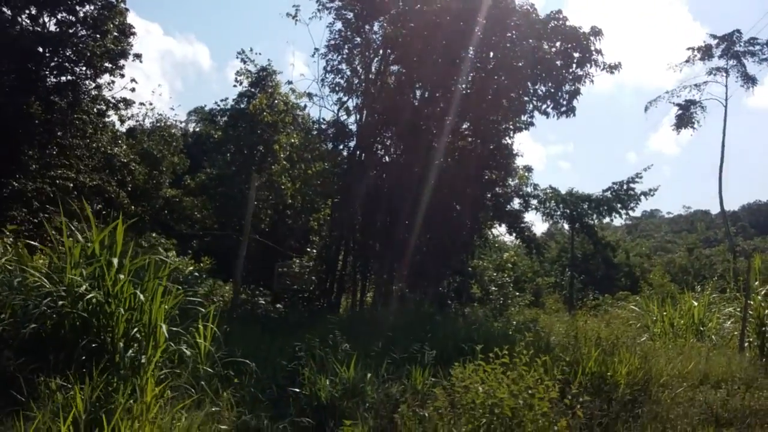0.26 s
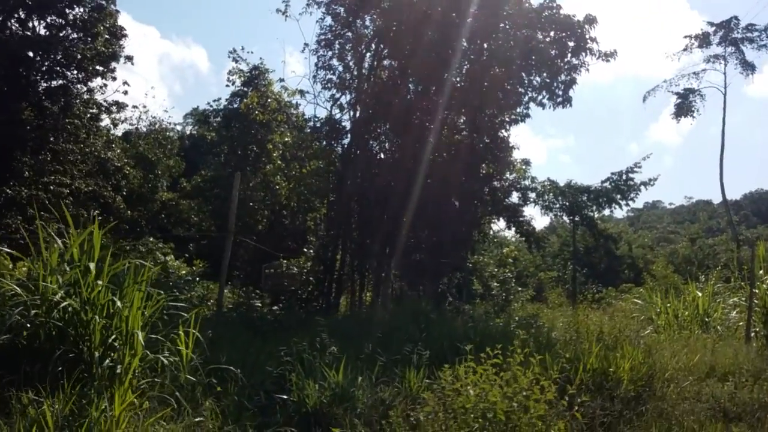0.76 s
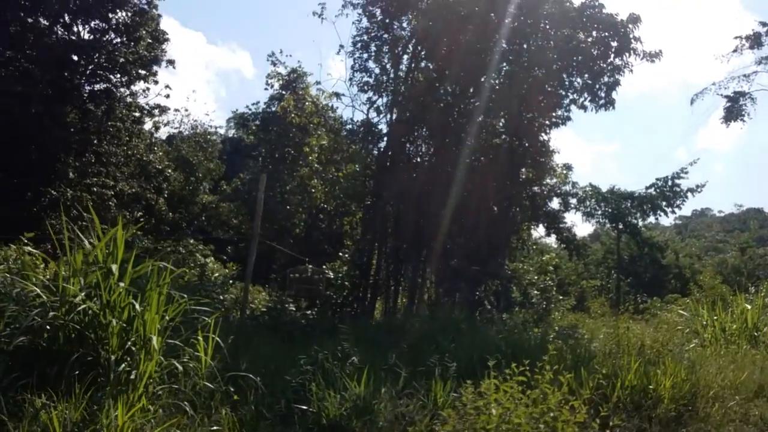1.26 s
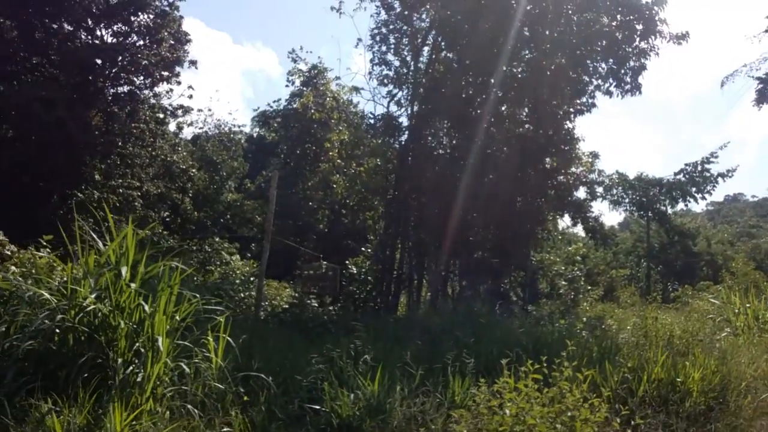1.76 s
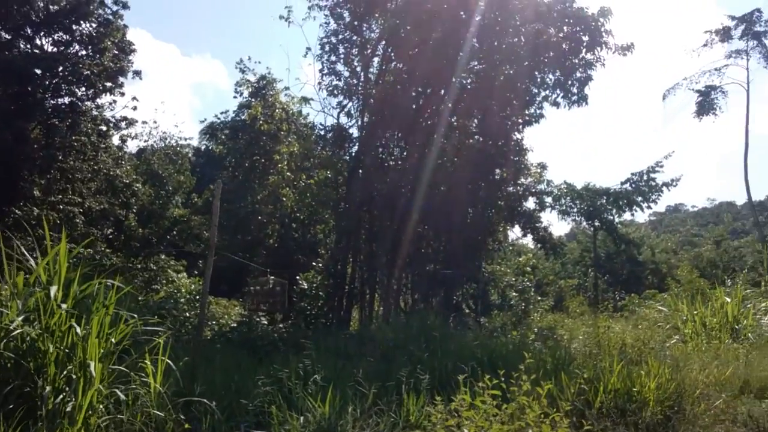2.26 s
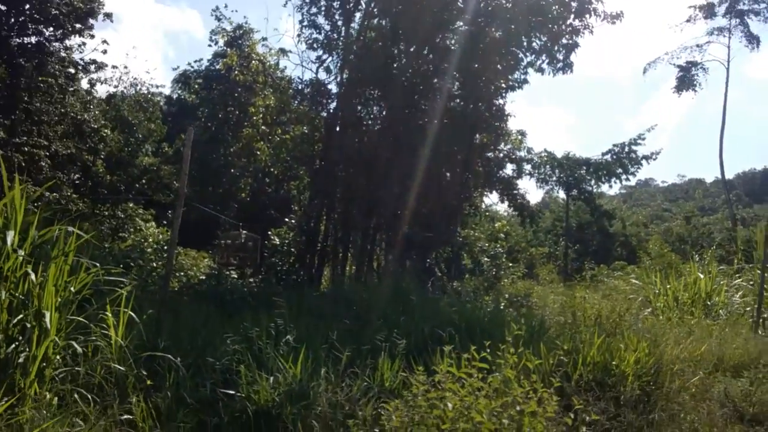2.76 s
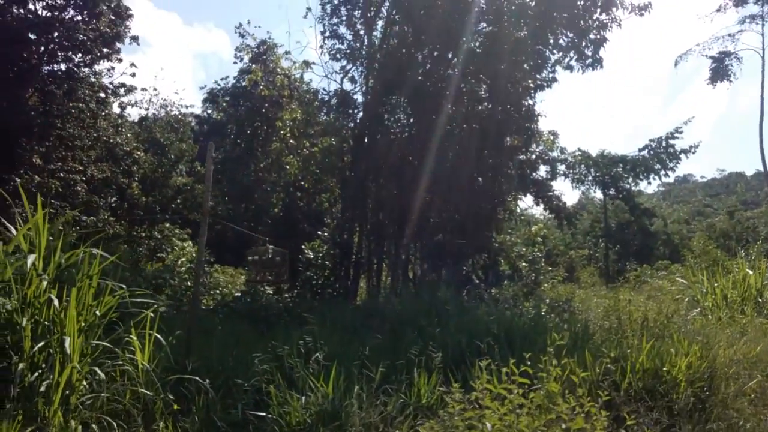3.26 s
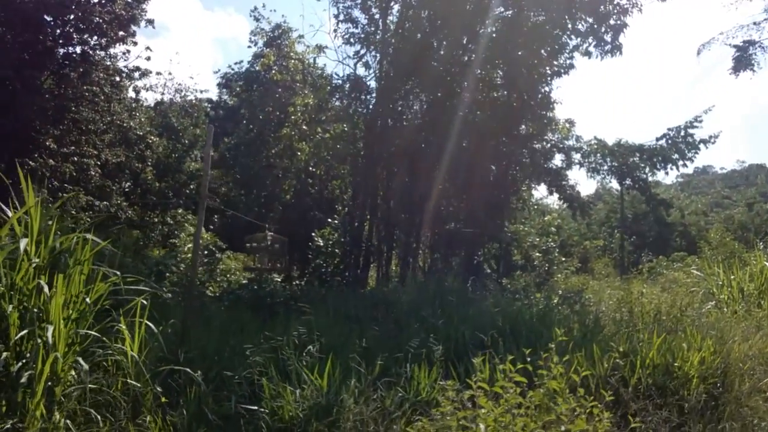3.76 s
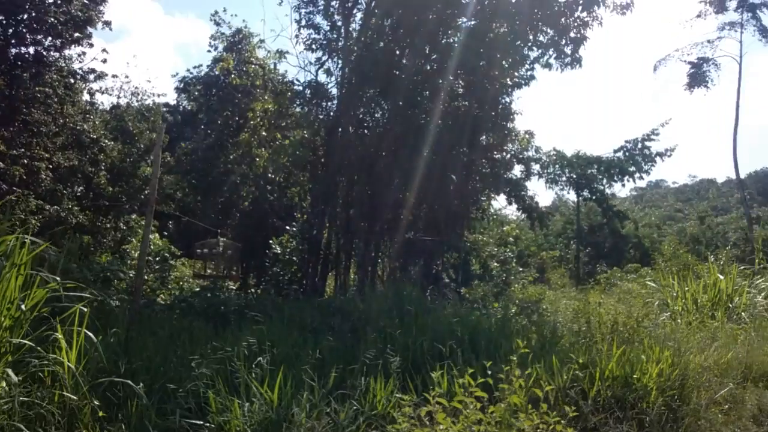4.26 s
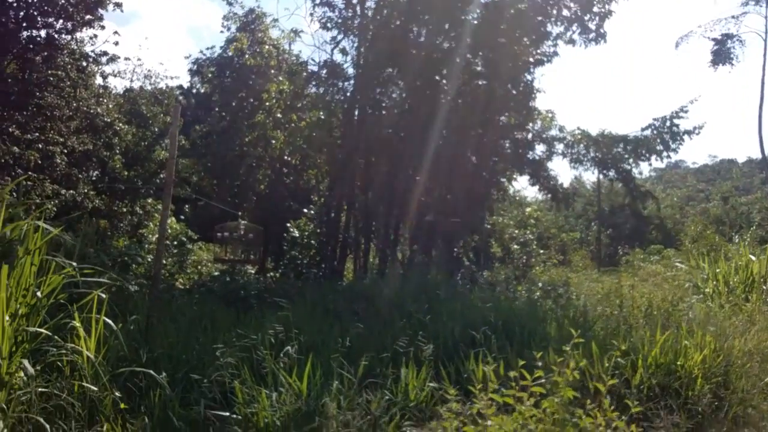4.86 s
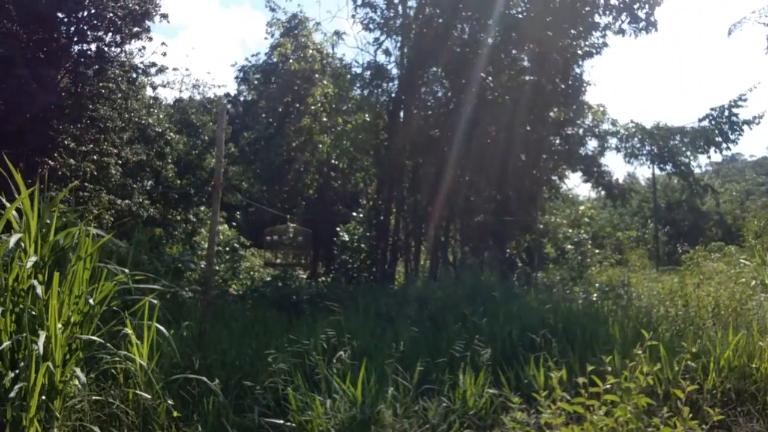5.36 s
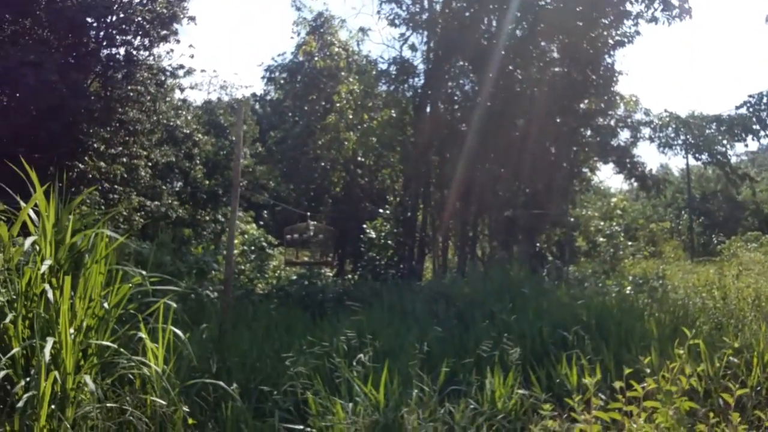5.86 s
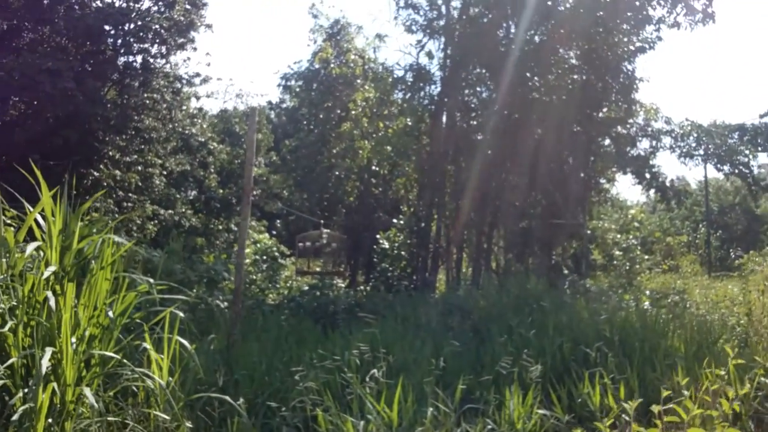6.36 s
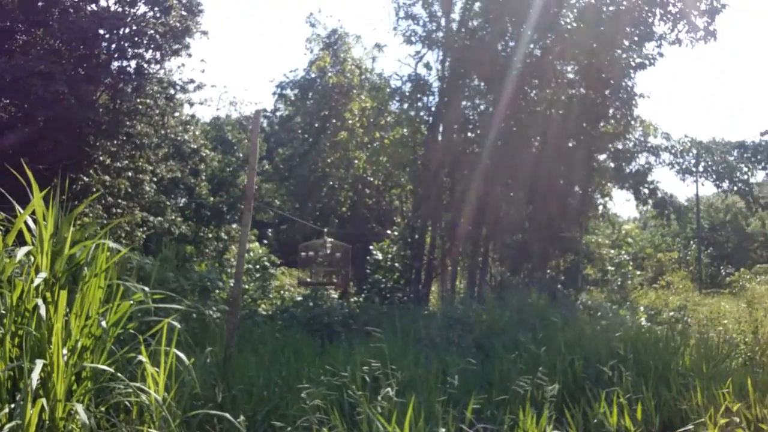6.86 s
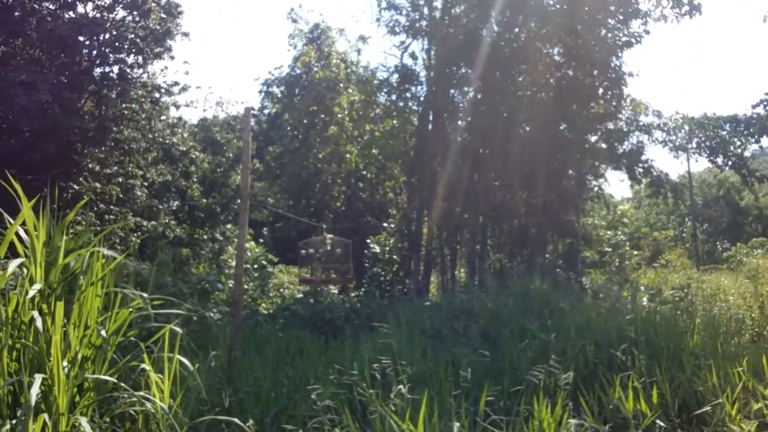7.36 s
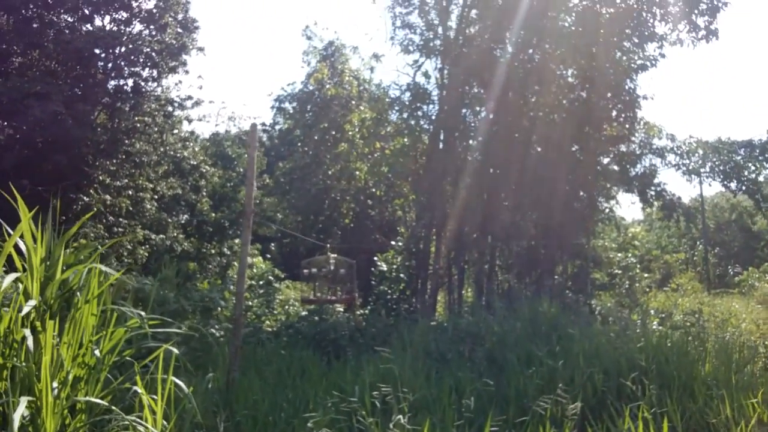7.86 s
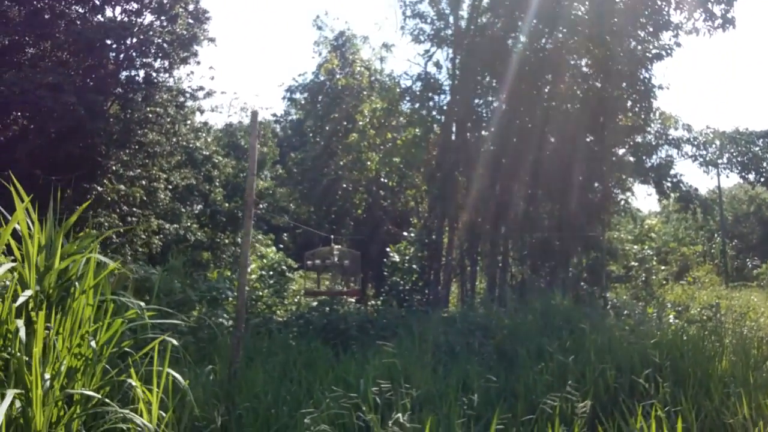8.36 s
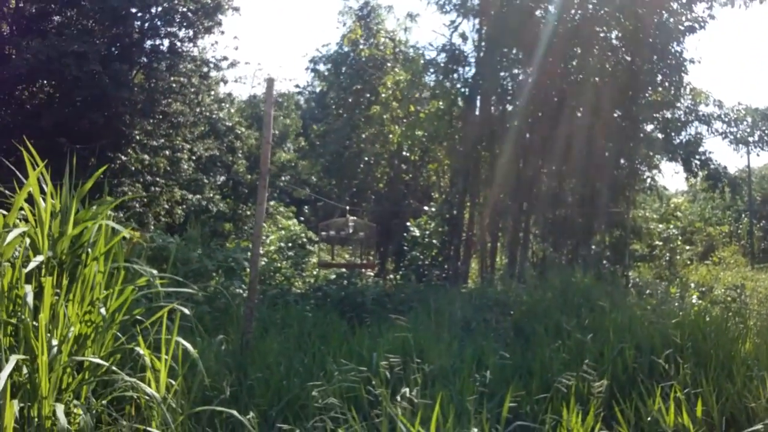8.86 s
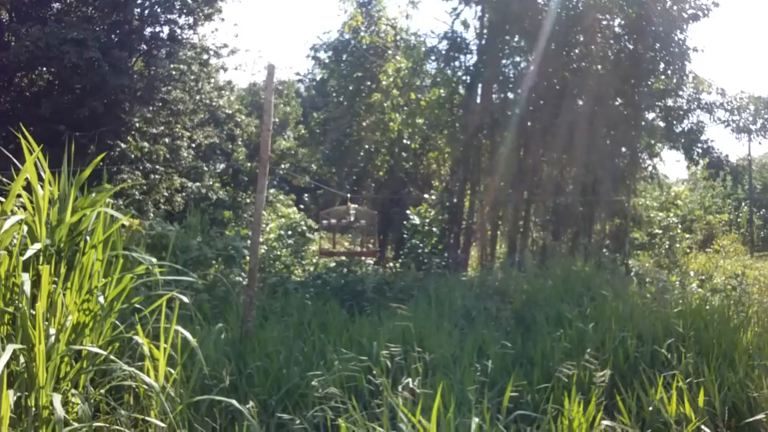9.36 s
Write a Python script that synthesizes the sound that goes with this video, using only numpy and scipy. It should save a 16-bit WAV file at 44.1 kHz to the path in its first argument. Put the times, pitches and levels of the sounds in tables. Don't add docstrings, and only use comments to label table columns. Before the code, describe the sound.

A quiet outdoor meadow with soft hiss and faint pulsing crickets. Dry grass stems tick near a handheld microphone. A small finch gives one soft rising whistle, then a brief nasal call; wild birds answer from the trees in quick sliding chirps. A stalk scrapes the casing midway. Later the close finch whistles three brighter rising notes, as wind thumps low, and a few distant chirps follow.

```python
import sys
import numpy as np
from scipy import signal
from scipy.io import wavfile
from scipy.ndimage import uniform_filter1d

SR = 44100
rng = np.random.default_rng(int(sys.argv[2]) if len(sys.argv) > 2 else 0)


def bounce(signal):
    frames = np.transpose(np.atleast_2d(signal))
    limited = np.clip(frames, -1, 1)
    pcm = np.round(limited * 32767).astype(np.int16)
    wavfile.write(sys.argv[1], SR, pcm)


def gain_from_decibels(decibels):
    exponent = np.asarray(decibels, float) / 20
    return 10 ** exponent


N = 423360


def rms_one(x):
    return x / np.sqrt(np.mean(x ** 2) + 1e-20)


def band(x, low_hz, high_hz):
    sos = signal.butter(2, [low_hz, min(high_hz, .47 * SR)], "band", fs=SR, output="sos")
    return signal.sosfilt(sos, x)


def add(out, start_s, sound):
    at = int(start_s * SR)
    out[at:at + len(sound)] += sound[:max(N - at, 0)]


def drift(rate_hz, size):
    knots = rng.standard_normal(int(size / SR * 400) + 402)
    r = np.exp(-2 * np.pi * rate_hz / 400)
    slow = rms_one(signal.lfilter([1], [1, -2 * r, r * r], knots)[400:])
    return np.interp(np.arange(size) * 400 / SR, np.arange(len(slow)), slow)


def birdsong(notes, waver_db, waver_hz, rough, overtone_db):
    out = np.zeros(N)
    for note in notes:
        s, hz, db = np.transpose(note)
        t = np.arange(s[0], s[-1], 1 / SR)

        glide = uniform_filter1d(np.interp(t, s, hz), size=300, mode="nearest")
        pitch = glide + waver_hz * drift(70, len(t))
        phase = 2 * np.pi * np.cumsum(pitch) / SR
        tone = np.sin(phase) + gain_from_decibels(overtone_db) * np.sin(2 * phase)

        swell = np.interp(t, s, gain_from_decibels(.7 * db)) ** (1 / .7)
        swell = uniform_filter1d(swell, size=60, mode="nearest")
        rasp = band(rng.standard_normal(len(t)), 70, 600)
        level = swell * gain_from_decibels(waver_db * drift(60, len(t))) * (1 + rough * rasp)
        fade = np.clip(np.minimum(t - s[0], s[-1] - t) / .002, 0, 1)
        add(out, s[0], np.sqrt(2) * level * fade * tone)
    return out


def foliage(x, spread_s, direct_db):
    t = np.arange(SR // 4) / SR
    paths = rng.standard_normal(len(t)) * np.exp(-t / spread_s)
    paths /= np.sqrt(np.sum(paths ** 2))
    paths[0] = gain_from_decibels(direct_db)
    return signal.fftconvolve(x, paths / np.sqrt(np.sum(paths ** 2)))[:N]


def caged_finch():
    # [start_s, pitch_hz, level_db]
    whistles = [
        [(1.5, 3311, -61.1), (1.52, 3315, -43.8), (1.5339, 3438, -53.2), (1.5479, 3579, -35.8),
         (1.5554, 3592, -35.7), (1.5803, 3667, -28.3), (1.6018, 3621, -64.2)],
        [(7.34, 3378, -57.8), (7.3664, 3412, -44.6), (7.3739, 3405, -30.6), (7.3874, 3616, -40.1),
         (7.4029, 3657, -21.7), (7.4243, 3667, -22.9), (7.4348, 3709, -18.8), (7.4433, 3717, -29.0),
         (7.4527, 3661, -42.8)],
        [(7.945, 2948, -45.0), (7.9694, 3144, -27.4), (7.9769, 3232, -33.3), (7.9904, 3341, -23.6),
         (7.9999, 3475, -29.7), (8.0268, 3636, -15.5), (8.0383, 3705, -16.4), (8.0458, 3773, -28.5),
         (8.0687, 3912, -11.4), (8.0707, 3940, -12.1), (8.0757, 3928, -26.7), (8.0827, 3776, -30.7)],
        [(8.215, 2875, -44.0), (8.2344, 3090, -42.0), (8.2579, 3210, -20.3), (8.2783, 3436, -24.5),
         (8.2838, 3539, -17.3), (8.2963, 3674, -14.2), (8.3013, 3729, -14.4), (8.3043, 3833, -21.6),
         (8.3153, 3932, -13.0), (8.3307, 4019, -11.7), (8.3462, 4072, -13.5), (8.3597, 4075, -44.1)],
    ]
    return birdsong(whistles, waver_db=.4, waver_hz=14, rough=.2, overtone_db=-55)


def nasal_call():
    # [start_s, pitch_hz, level_db]
    partials = [
        [(2.206, 3569, -49), (2.241, 3875, -55), (2.305, 3960, -42.5), (2.323, 4270, -34.5), (2.335, 4323, -29),
         (2.358, 4280, -31), (2.372, 4640, -47)],
        [(2.211, 5470, -57), (2.24, 5818, -44.5), (2.272, 5817, -48), (2.299, 5901, -42), (2.327, 6530, -54),
         (2.36, 6542, -64)],
        [(2.296, 4072, -43), (2.318, 4840, -37), (2.345, 4830, -34), (2.359, 4920, -36), (2.372, 4670, -47)],
        [(2.231, 7640, -69), (2.289, 7840, -66), (2.31, 7957, -75)],
        [(2.321, 2444, -67), (2.353, 2441, -54), (2.365, 2433, -69)],
    ]
    return birdsong(partials, waver_db=1.5, waver_hz=35, rough=.5, overtone_db=-60)


def tree_birds():
    # [start_s, pitch_hz, level_db]
    tree_notes = [
        [(3.186, 4158, -63), (3.223, 3853, -52), (3.239, 3799, -56), (3.25, 3763, -73)],
        [(3.541, 4292, -64), (3.569, 4027, -51), (3.587, 3891, -48), (3.61, 3767, -61)],
        [(3.671, 3616, -61), (3.708, 3938, -46), (3.775, 3976, -50), (3.789, 4133, -43)],
        [(3.686, 5105, -76), (3.714, 4822, -53), (3.788, 4184, -42), (3.809, 4001, -42), (3.829, 3893, -53)],
        [(3.84, 2916, -70), (3.918, 3476, -63), (3.956, 3881, -44), (3.97, 3976, -55)],
        [(3.9, 6560, -66), (3.921, 6446, -51), (3.934, 6308, -68)],
        [(3.971, 5685, -59), (3.991, 5207, -53), (4.04, 4896, -65)],
        [(4.041, 5557, -70), (4.137, 4691, -52), (4.161, 4665, -43), (4.18, 4641, -43), (4.199, 4612, -53)],
        [(4.086, 6126, -67), (4.103, 6108, -49), (4.121, 6054, -62), (4.22, 6267, -53), (4.259, 6309, -67)],
        [(4.121, 4201, -52), (4.137, 4129, -39), (4.155, 3981, -41), (4.175, 3997, -49)],
        [(4.23, 4256, -60), (4.245, 4143, -39), (4.268, 3934, -35), (4.289, 3842, -55)],
        [(4.441, 3866, -52), (4.467, 3107, -59), (4.52, 2901, -61)],
        [(4.611, 5187, -61), (4.635, 4624, -47), (4.66, 4163, -42), (4.675, 3968, -44), (4.684, 3883, -57)],
        [(4.745, 4374, -50), (4.755, 4323, -44), (4.776, 4263, -47), (4.789, 4175, -55)],
        [(4.76, 3895, -59), (4.768, 3733, -45), (4.799, 3034, -64)],
        [(4.861, 2834, -67), (4.878, 3110, -58), (4.894, 3185, -58), (4.93, 3034, -69)],
        [(5.001, 4602, -63), (5.019, 4378, -48), (5.029, 4261, -57), (5.04, 4182, -61)],
        [(5.046, 5036, -55), (5.056, 5004, -51), (5.068, 4955, -63), (5.109, 4999, -62)],
        [(5.08, 2573, -68), (5.115, 2471, -62), (5.189, 2349, -71)],
        [(5.12, 4477, -58), (5.134, 4343, -51), (5.149, 4175, -58)],
        [(5.18, 4312, -56), (5.205, 3997, -47), (5.232, 3411, -53), (5.254, 2672, -63)],
        [(5.471, 5159, -66), (5.482, 4858, -58), (5.5, 4578, -66)],
        [(8.58, 5511, -67), (8.627, 4877, -51), (8.684, 4561, -42), (8.714, 4470, -42), (8.729, 4396, -56)],
        [(8.801, 6877, -71), (8.85, 5851, -64), (8.875, 5611, -57), (8.92, 5328, -59)],
        [(9.075, 4472, -63), (9.104, 4577, -47), (9.115, 4634, -57), (9.139, 4569, -56)],
        [(9.24, 4282, -55), (9.264, 4371, -51), (9.27, 4404, -55)],
        [(3.35, 2390, -71), (3.37, 2390, -66), (3.429, 2390, -65)],
        [(3.5, 2400, -69), (3.537, 2400, -65), (3.56, 2379, -70)],
    ]
    # [start_s, pitch_hz, level_db]
    faint_notes = [
        [(0, 265, -54.5), (.06, 245, -83)],
        [(2.21, 1846, -73), (2.3, 2000, -68)],
        [(3.75, 2130, -69.5), (3.9, 2250, -60.5)],
        [(2.205, 4350, -51), (2.235, 3900, -48.5)],
    ]
    song = birdsong(tree_notes + faint_notes, waver_db=2.5, waver_hz=45, rough=1.4, overtone_db=-60)
    return 1.2 * foliage(song, spread_s=.03, direct_db=4.0)


def snaps(rows, cycles, crack_db):
    out = np.zeros(N)
    t = np.arange(-100, 300) / SR
    grits = rng.standard_normal((len(rows), len(t)))
    for (s, db, hz), grit in zip(rows, grits):
        decay = np.exp(-np.abs(t) * hz / cycles * np.where(t < 0, 2, 1))
        swing = np.sin(2 * np.pi * hz * t) * decay
        crack = grit * np.exp(-np.abs(t) / 0.00031)
        add(out, s - .0015, gain_from_decibels(db) * (1.7 * swing + gain_from_decibels(crack_db) * crack))
    return out


def stalk_ticks():
    # [start_s, peak_db, ring_hz]
    dull_ticks = [(0.554, -49, 1920), (0.602, -46, 2580), (0.642, -46, 2160), (4.645, -36.5, 1360),
                  (4.736, -44, 2407), (5.708, -53, 870), (6.56, -41, 1960), (6.568, -38.5, 1480),
                  (6.706, -38, 1803), (6.725, -40, 1660), (7.947, -39.5, 1530), (7.968, -43, 2800)]
    # [start_s, peak_db, ring_hz]
    bright_ticks = [(0.5153, -44, 4050), (0.5546, -46, 4390), (0.602, -53, 3880), (0.6549, -33, 3780),
                    (0.7223, -36.5, 3600), (1.2497, -42, 3990), (1.4391, -46, 3800), (2.4813, -34, 4200),
                    (3.4371, -35, 3920), (6.7053, -38, 3600), (6.7253, -40.5, 3880), (6.9314, -43.5, 4190),
                    (9.382, -33, 3830)]
    return snaps(dull_ticks, cycles=1.3, crack_db=-15) + snaps(bright_ticks, cycles=.9, crack_db=-16)


def rustles():
    # [start_s, end_s, centre_hz, width_octaves, level_db, grains_per_s]
    swarms = [(2.175, 2.3, 5300, .5, -52, 3600), (3.759, 3.834, 7500, .35, -60.5, 4000),
              (3.93, 4.0, 5700, .35, -52.5, 3000), (4.313, 4.363, 2500, 2.5, -46.5, 3400),
              (4.354, 4.444, 5530, 0.73, -55, 2700), (4.435, 4.55, 3600, .5, -56, 3100),
              (5.097, 5.135, 5950, 0.58, -58, 1500), (5.294, 5.323, 4480, 1.4, -52, 1500),
              (5.361, 5.46, 4200, 1.3, -52.5, 2800), (5.442, 5.462, 4630, 1.1, -47.5, 1800),
              (5.603, 5.65, 5000, .8, -52, 2100), (8.609, 8.73, 4640, 0.32, -54, 4600),
              (6.219, 6.305, 4140, .35, -61, 2100), (7.33, 7.377, 4340, .4, -52.5, 1920),
              (7.532, 7.6, 4220, .3, -55.5, 2300), (7.893, 7.962, 4090, .35, -50.5, 1700),
              (9.242, 9.427, 4040, .3, -58.5, 1350), (3.984, 4.056, 4350, 0.44, -49, 3000)]
    out = np.zeros(N)
    for start, end, hz, octaves, db, per_s in swarms:
        draw = rng.random((3, SR // 4))[:, :int((end - start) * SR)]
        strength = gain_from_decibels(-3.0 * np.log(draw[1] + 1e-3))
        grains = (draw[0] < per_s / SR) * strength * np.sign(draw[2] - .5)
        edges = hz / 2 ** (octaves / 2), hz * 2 ** (octaves / 2)
        swarm = rms_one(band(band(grains + 1e-9, *edges), *edges))
        add(out, start, gain_from_decibels(db) * swarm * signal.windows.tukey(len(swarm), .5))
    return out


def scrape():
    # [start_s, peak_db]
    slips = [(5.618, -46), (5.625, -39), (5.63, -37), (5.635, -30), (5.638, -36), (5.641, -31),
             (5.6424, -24), (5.645, -24), (5.6475, -29), (5.6503, -21.5), (5.6535, -23), (5.6539, -19.5),
             (5.6577, -32), (5.664, -22), (5.666, -25)]
    # [mode_hz, level_db, width_hz]
    casing = [
        (3100, -8, 700),
        (4000, 0, 700),
        (6000, -9, 800),
        (9300, -21, 1500),
        (12500, -27, 2500),
    ]
    out, rows = np.zeros(N), np.array(slips)
    at = ((rows[:, 0] - .0006) * SR).astype(int)
    for hz, db, width in casing:
        knocks = np.zeros(N) + 1e-18
        strength = gain_from_decibels(rows[:, 1] + db + rng.normal(0, 1.8, len(at)))
        knocks[at] = strength * rng.choice([-1, 1], len(at))
        r, w = np.exp(-np.pi * width / SR), 2 * np.pi * hz / SR
        poles = [1, -2 * r * np.cos(w), r * r]
        once = signal.lfilter([1], poles, knocks)
        out += signal.lfilter([(1 - r) * 5 * np.sin(w) ** 2], poles, once)
    return band(band(out, 2900, 16000), 2600, 18000)


def wind():
    # [time_s, level_db]
    gust_levels = [(4.9, -70), (5.4, -63.5), (5.95, -66), (6.1, -68), (7.15, -74), (7.27, -52), (7.4, -66),
                   (7.55, -60.5), (7.8, -60.5), (8.0, -62), (8.3, -43), (8.62, -45.5), (8.75, -58),
                   (9.1, -61.5), (9.6, -86)]
    # [time_s, peak_db, swing_hz]
    thumps = [(5.597, -31.5, 107), (5.824, -36.5, 81), (5.922, -42.5, 64), (7.308, -48.5, 87.6),
              (7.601, -43, 60), (8.027, -43.5, 73), (8.077, -40, 96), (8.124, -41, 58), (8.197, -45, 67),
              (8.219, -50, 64), (8.246, -31, 78), (8.28, -28.5, 103.1), (8.3, -26, 108), (8.359, -33, 102),
              (8.388, -29, 96), (8.415, -26.5, 124), (8.474, -23, 76), (8.523, -38, 62), (8.579, -33, 78),
              (8.616, -30, 79.3), (8.644, -37, 55), (8.82, -46, 81), (8.865, -30.5, 132),
              (9.002, -43.5, 112), (9.101, -44, 67.5)]
    s, db = np.transpose(gust_levels)
    gust = np.interp(np.arange(N) / SR, s, db, left=-90)
    turbulence = rms_one(band(rng.standard_normal(N), 25, 101))
    out = gain_from_decibels(gust + 4.36 * drift(21, N)) * turbulence
    for (s, db, hz), turn in zip(thumps, rng.random(len(thumps))):
        t = np.arange(-1.3 / hz, 1.28 / hz, 1 / SR)
        swing = np.sin(2 * np.pi * (hz * t + turn))
        lopsided = swing + 0.51 * swing ** 2
        add(out, s + t[0], gain_from_decibels(db - 2.0) * np.hanning(len(t)) * lopsided)
    return out


def crickets():
    # [wing_hz, strokes_per_s, level_db, trills as (start_s, end_s)]
    singers = [
        (7230, 54.0, -72, [(0, .19), (.43, .69), (.95, 1.19), (1.37, 1.61), (1.89, 2.08), (2.38, 2.64), (2.83, 3.1), (3.32, 3.59), (3.85, 4.12), (4.31, 4.55), (4.75, 5.01), (5.19, 5.45), (5.67, 5.93), (6.14, 6.4), (6.7, 6.94), (7.22, 7.43), (7.65, 7.89), (8.08, 8.31), (8.52, 8.76), (9.03, 9.27), (9.45, 9.6)]),
        (7450, 55.0, -75, [(2.55, 2.75), (3.05, 3.26), (3.5, 3.74), (4.9, 5.07), (5.3, 5.53), (5.75, 6.0), (6.67, 6.92), (8.56, 8.77)]),
        (6850, 53.0, -76, [(.3, .6), (.75, 1.05), (1.42, 1.7), (3.3, 3.6), (4.75, 5.0), (5.7, 5.95), (6.15, 6.42), (8.5, 8.77)]),
        (5640, 53.5, -69.5, [(.53, .85), (1.3, 1.6), (2.9, 3.17), (3.72, 3.95), (4.5, 4.82), (5.45, 5.6), (6.1, 6.45), (6.9, 7.2), (7.55, 7.95), (8.45, 8.8)]),
        (5420, 53.7, -71.5, [(.1, .26), (.8, 1.1), (1.95, 2.17), (2.85, 3.05), (3.65, 3.8), (4.35, 4.5), (5.2, 5.45), (8.95, 9.6)]),
    ]
    out = np.zeros(N)
    for wing_hz, per_s, db, trills in singers:
        for start, end in trills:
            t = np.arange(0, end - start, 1 / SR)
            stroke = (t * per_s) % 1
            onset = np.clip(t / .06 + .3, 0, 1)
            shape = np.sin(np.pi * np.clip(stroke / .7, 0, 1)) * onset
            pitch = wing_hz * (1 + .05 * (.35 - stroke) + .007 * drift(20, len(t)))
            tone = np.sin(2 * np.pi * np.cumsum(pitch) / SR)
            level = 2.3 * gain_from_decibels(db + 1.5 * drift(10, len(t)))
            add(out, start, level * shape * tone)
    return foliage(out, spread_s=.02, direct_db=5.0)


def blades():
    draw = rng.random((3, N))
    touched = draw[0] < 200 * gain_from_decibels(5.0 * drift(1.5, N)) / SR
    grains = touched * gain_from_decibels(-2.5 * np.log(draw[1] + .02)) * np.sign(draw[2] - .5)
    return gain_from_decibels(-70) * rms_one(band(grains, 3300, 4500))


def meadow():
    # [freq_hz, density_db]
    spectrum = [(25, -18.5), (55, -5), (105, -0.5), (200, -6), (450, -8), (1000, -10.5), (2000, -10.5),
                (2900, -12.5), (3600, -9), (4300, -9), (5100, -15), (6000, -16), (7800, -23.5),
                (16000, -25.5)]
    out, edges = 0, 22 * 2 ** np.arange(0, 10, .3)
    white = rng.standard_normal((2, N))
    points = np.array(spectrum)
    for k, (low, high) in enumerate(zip(edges[:-2], edges[1:])):
        db = np.interp(np.log(low * high) / 2, np.log(points[:, 0]), points[:, 1])
        out = out + gain_from_decibels(db + 1.24 * drift(6, N)) * band(white[k % 2], low, high)
    return gain_from_decibels(-59.5) * rms_one(out)


def wood(x):
    # [delay_s, level_db]
    echoes = [
        (.17, -30.5),
        (.22, -36.5),
    ]
    t60_s, tail_db = 0.93, -15
    t = np.arange(SR) / SR
    dense = rng.standard_normal((2, SR))
    tail = dense[0] * gain_from_decibels(-60 * t / t60_s) * np.clip(t / 0.014, 0, 1)
    tail *= gain_from_decibels(tail_db) / np.sqrt(np.sum(tail ** 2))
    for delay_s, db in echoes:
        smear = dense[1] * np.exp(-((t - delay_s) / 0.0027) ** 2)
        tail += gain_from_decibels(db) * smear / np.sqrt(np.sum(smear ** 2))
    return signal.fftconvolve(x, tail)[:N]


def suppressor():
    # [time_s, level_db]
    opening = [(0.0, -71), (0.33, -76), (0.63, -72), (0.82, -74.5), (1.14, -74), (1.48, -71.5), (1.58, -70),
               (1.839, -75), (2.08, -74), (2.18, -73.5), (2.23, -71), (2.34, -67.8), (2.52, -69.5),
               (2.59, -74), (2.8, -74), (3.67, -72), (3.86, -69), (4.19, -68), (4.58, -68.5), (4.81, -67),
               (4.91, -71.5), (4.99, -71.5), (5.42, -69.5), (5.57, -71.5), (5.63, -69.5), (5.66, -69),
               (5.7, -73.5), (5.74, -71.5), (6.04, -74), (6.96, -74), (7.25, -74), (7.43, -68), (7.6, -70),
               (7.66, -71), (7.86, -72.5), (7.97, -67.5), (8.02, -66.5), (8.22, -66.6), (8.31, -66),
               (8.7, -67.5), (8.76, -70), (8.93, -71), (9.35, -70.4), (9.59, -71.5)]
    shut_db = -74.5
    s, db = np.transpose(opening)
    return gain_from_decibels(np.interp(np.arange(N) / SR, s, db) - shut_db)


def scene():
    near = caged_finch()
    nasal = nasal_call()
    far = tree_birds()
    grass = stalk_ticks() + rustles() + scrape()
    tails = wood(near + gain_from_decibels(6) * nasal + gain_from_decibels(14) * far + gain_from_decibels(1.5) * grass)
    back = (meadow() + blades() + crickets() + gain_from_decibels(-13.5) * tails) * suppressor()
    return (near + nasal + far + grass + wind() + back)[None]


def roll_off(x):
    return signal.sosfilt(signal.butter(12, 16380, fs=SR, output="sos"), x)


def record(dry):
    cut = signal.sosfilt(signal.ellip(10, .5, 60, 15750, fs=SR, output="sos"), dry)
    return roll_off(cut)


dry = scene()
out = record(dry)
bounce(out)
```